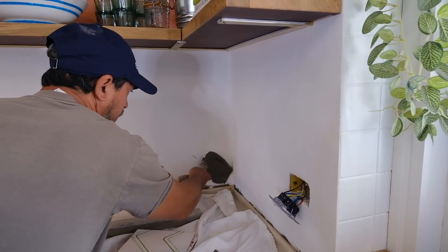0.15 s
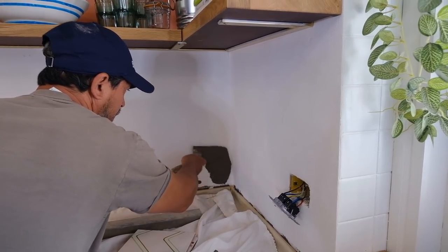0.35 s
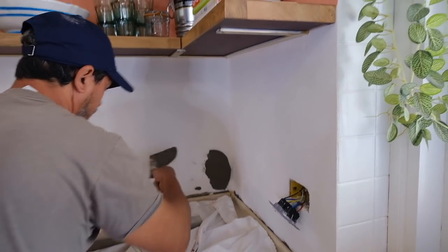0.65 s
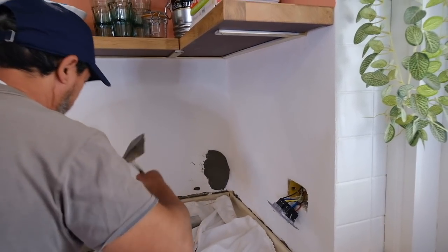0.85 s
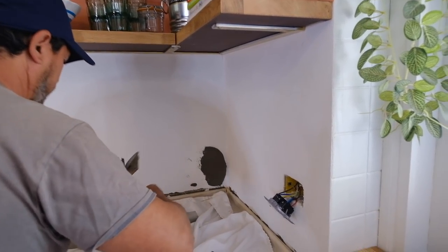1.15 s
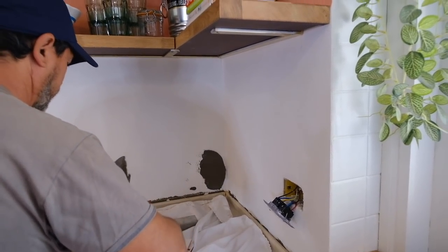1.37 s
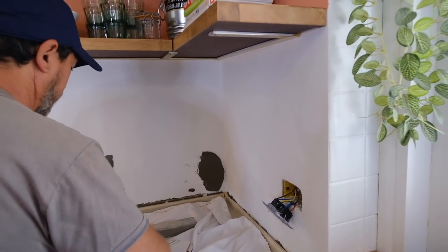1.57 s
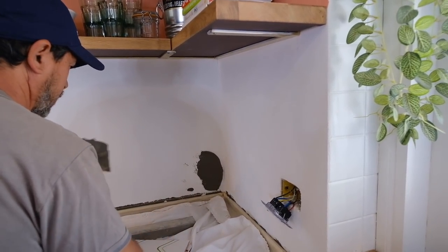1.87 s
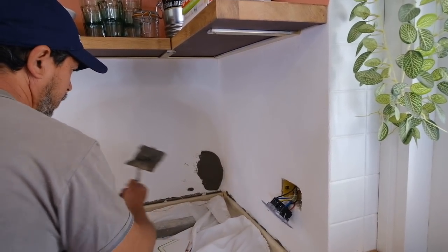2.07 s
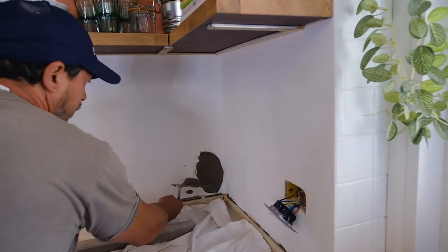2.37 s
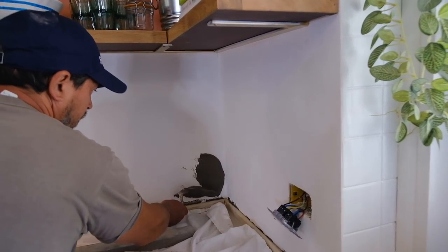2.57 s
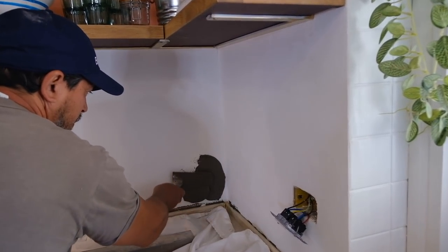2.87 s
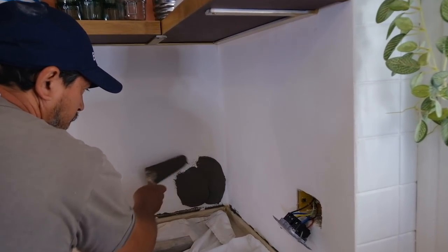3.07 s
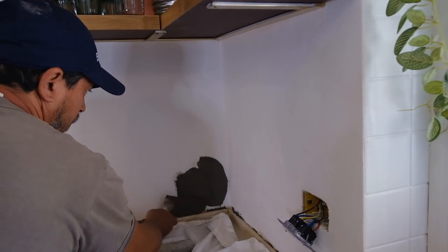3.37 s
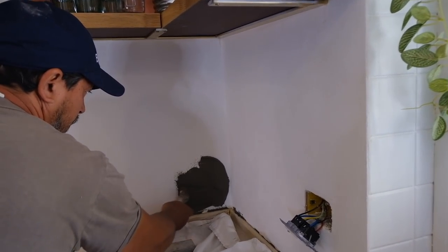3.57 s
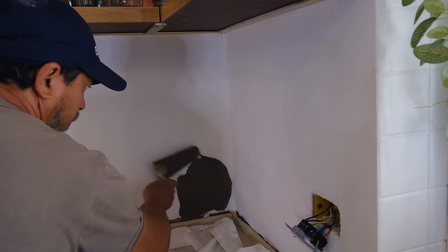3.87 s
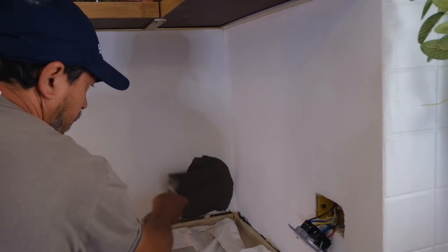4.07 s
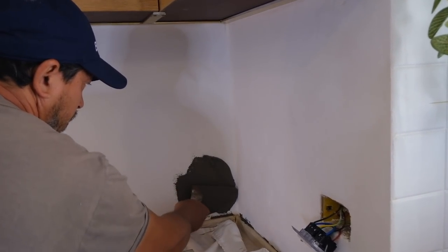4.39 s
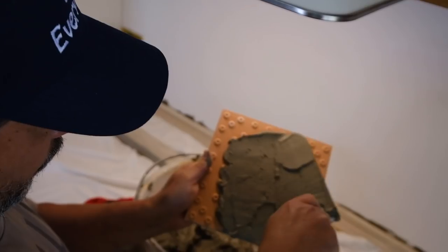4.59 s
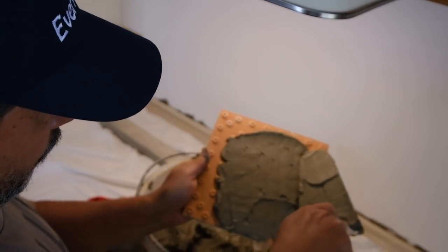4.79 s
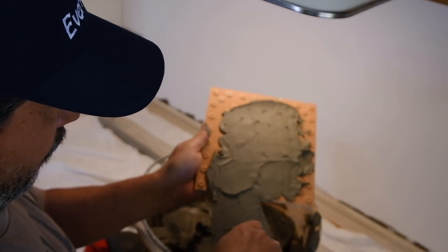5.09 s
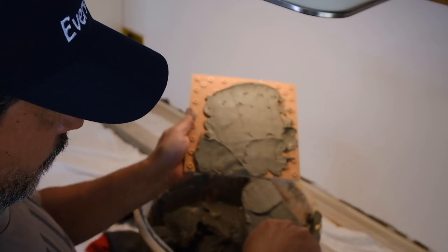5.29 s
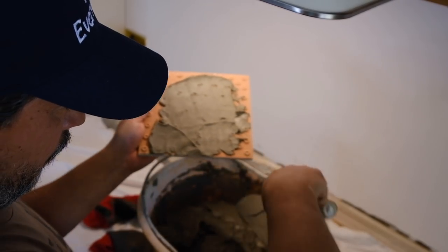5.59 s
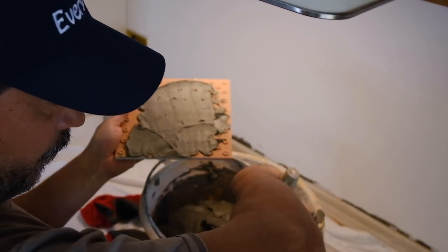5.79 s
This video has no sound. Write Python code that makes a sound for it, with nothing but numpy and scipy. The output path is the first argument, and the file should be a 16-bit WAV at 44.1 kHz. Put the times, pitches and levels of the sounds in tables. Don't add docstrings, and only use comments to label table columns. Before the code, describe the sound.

Short sandy trowel scrapes and clinks on a wall, then chattering drags over a tile back, in a bright, reverberant room.

```python
import sys
import numpy as np
from scipy import signal
from scipy.fft import rfft, irfft, next_fast_len
from scipy.io import wavfile
from scipy.ndimage import map_coordinates

SR = 44100
rng = np.random.default_rng(int(sys.argv[2]) if len(sys.argv) > 2 else 0)


def makeup_ratio(level_db):
    decades = np.asarray(level_db, float) / 20
    return 10 ** decades


def output_pcm(signal):
    pcm = np.clip(np.atleast_2d(signal).T, -1, 1) * 32767
    wavfile.write(sys.argv[1], SR, np.round(pcm).astype(np.int16))


N = 261954
RING_N = 4000
TAIL_N = int(0.7 * SR)
LEAD_N = 64

# (start [s], length [s], force [dB], swell or fade [dB], edge steepness [dB])
WALL_PUSHES = [
    [(.466, 0.044, -32.5, 3.5, 10), (.505, 0.044, -25.5, 8, -4.5), (.556, 0.025, -19.5, -7.5, -10)],
    [(1.197, 0.04, -20.5, -16.5, 4), (1.254, 0.069, -38, 7.5, -4), (1.335, 0.022, -31.5, 3, 0.5),
     (1.357, 0.032, -31, -0.5, 1.5)],
    [(1.39, 0.021, -34.5, 11, 2), (1.416, 0.049, -25.5, 1, -1), (1.47, 0.022, -23, 2.5, 2.5),
     (1.496, 0.065, -21.5, -6.5, 1)],
    [(1.565, 0.036, -28.5, 3.5, 3), (1.601, 0.022, -22.5, -1.5, 2.5), (1.628, .014, -25, 1.5, 1.5),
     (1.645, 0.086, -23, 2.5, 0.1), (1.739, 0.064, -20.5, -18, 2)],
    [(3.047, 0.048, -23.5, -5, 1), (3.097, .022, -27, -4.5, -2.5)],
    [(3.875, 0.032, -20.5, -6.5, -1.5), (3.903, 0.054, -27, -8.5, -3.5)],
]
TILE_PUSHES = [
    [(4.599, .005, -39, 3, -2), (4.606, 0.022, -20.5, -1.5, 1.5), (4.636, .009, -22.5, -1.5, -1.5)],
    [(4.66, 0.005, -22, -1.5, 1.5), (4.669, .004, -19, -3, 1.5), (4.678, 0.02, -22, -9, 1.5)],
    [(4.723, 0.009, -24.5, -1.5, 3), (4.736, .016, -24, -4, 3), (4.772, .012, -26, -14, 3.5)],
    [(5.168, 0.022, -22.5, -2, 2), (5.199, 0.02, -24, -3.5, 3.5), (5.22, 0.028, -24, -1, 3.5),
     (5.252, 0.012, -21.5, -8, 3), (5.275, .014, -21, -5.5, 5), (5.293, .012, -19, -10.5, -10)],
]
# (frequency [Hz], width [Hz], level [dB])
WALL_RINGS = [
    [(1360, 90, 5.5), (1914, 110, 4.5), (2580, 133, 0.5), (2960, 100, -3), (4900, 79, -15)],
    [(936, 48, -1.5), (1336, 14, -18), (2330, 44, -11.5), (2814, 21, 0), (6060, 44, -26.5)],
    [(1700, 152, -6), (1790, 30, -7.5), (2680, 100, -5), (5680, 40, -13), (6530, 53, -12)],
    [(1284, 170, 2.5), (1650, 210, 5), (2970, 150, -2), (4460, 14, -21), (5500, 230, -9.5), (6400, 80, -11)],
    [(743, 50, 7), (1610, 40, -19), (2360, 110, -1), (3320, 78, -1), (4240, 200, -17), (5560, 68, -26)],
    [(575, 60, 3.5), (980, 160, -1), (1750, 80, -6), (3024, 26, -6), (3450, 36, -9), (3630, 110, -16),
     (6450, 41, -11)],
]
# (frequency [Hz], width [Hz], level [dB])
TILE_RINGS = [
    [(689, 24, 7.5), (1400, 29, 6.5), (1620, 50, 9), (2280, 330, 4), (3080, 48, 3.5)],
    [(996, 90, -4), (2245, 98, 6.5), (2420, 21, 6.5), (2970, 84, -3), (5340, 120, -9)],
    [(1040, 140, 0.5), (1690, 81, 9.5), (2470, 130, 6.5), (3600, 450, -3.5), (5410, 49, -18)],
    [(750, 73, -2), (1110, 19, -3.5), (1870, 46, 4), (3200, 124, -6.5), (3570, 38, -24.5),
     (4500, 47, -15.5), (5520, 30, -7)],
]
# (frequency [Hz], width [Hz], level [dB])
HOLLOWS = [(594, 62, -0.5), (400, 141, -15), (400, 24, -9), (420, 55, -10), (593, 32, 5.5), (564, 20, -14),
           (533, 52, -6), (690, 96, -4), (705, 53, -22), (368, 21, -1.5)]
# (backing thud [dB], edge bite [dB], grit hiss [dB])
VOICES = [(-12, 2, -10.5), (-10, -3.5, -5.5), (-13, -3, -8), (-13, -2, -6.5), (-8, -3, -9), (-8, 0.5, -1),
          (-10.5, -4, -12.5), (-10.5, 0.5, -8), (-2.5, -2.5, -11.5), (-16, -1, -7.5)]
SIDES_DB = [-1.3, -0.67, 0.31, -0.53, -1, -0.87, -2.2, -1.26, -1.5, -1.6]
WET_DB = [0.5, -1, -0.5, -1, -2, 0, -3, -1.5, -1.5, -0.5]
NEAR_DB = [-1, -1, -0.5, -2.5, -1.5, 1, -4.5, -1.5, -3.5, -1.5]
GRIPS_S = (0.0084, 0.004)
LIFT_S = 0.0032
THUD_FOLLOWS = 0.49
THUD_PER_EDGE, HISS_PER_EDGE = -0.2, 1
SPREAD = 3.5


def strokes(out):
    grips = np.repeat(GRIPS_S, [len(WALL_PUSHES), len(TILE_PUSHES)])
    per_stroke = zip(WALL_PUSHES + TILE_PUSHES, VOICES, WALL_RINGS + TILE_RINGS, HOLLOWS,
                     SIDES_DB, WET_DB, NEAR_DB, grips)
    for pushes, voice, rings, hollow, side_db, wet_db, near_db, grip_s in per_stroke:
        start_s = pushes[0][0]
        end_s = pushes[-1][0] + pushes[-1][1]
        t = start_s + np.arange(int((end_s - start_s) * SR) + RING_N) / SR
        touch = t < end_s + grip_s
        force = sand(len(t), per_s=9000, spread_db=3.0, clump_db=1.72) * touch

        base_db = np.insert(voice, 1, 0)
        per_edge = (THUD_PER_EDGE, 0, 1, HISS_PER_EDGE)
        follows = (THUD_FOLLOWS, 1, 1, 1)
        held_t = np.minimum(t, end_s + grip_s - LIFT_S)
        gains = [pressure(pushes, held_t, grip_s, *law) for law in zip(base_db, per_edge, follows)]

        heard = []
        for widen in (1, SPREAD):
            parts = bands(force, rings + [hollow], bed_db=-1.0, widen=widen)
            thud, *edge = [g * p / np.std(p[touch]) for g, p in zip(gains, parts)]
            heard.append(thud + sum(edge) * makeup_ratio([[side_db / 2], [-side_db / 2]]))
        direct, diffuse = heard
        add(out, start_s, direct, direct_db=-2.5, near_db=near_db - 8.0, far_db=wet_db - 7.5, diffuse=diffuse)


def sand(size, per_s, spread_db, clump_db):
    chance, sign, strength = rng.random((3, size))
    caught = chance < per_s / SR
    force = caught * np.sign(sign - 0.5) * makeup_ratio(-spread_db * np.log(strength + 0.0071))
    clumps = map_coordinates(rng.standard_normal(size // 120 + 4), [np.arange(size) / 130], order=1)
    return force * makeup_ratio(clump_db * clumps)


GRIP_CURVE = 0.83
DULLING_DB = -2.5


def pressure(pushes, t, grip_s, base_db, per_edge, follows):
    start_s, length_s, force_db, drift_db, edge_db = np.transpose(pushes)[:, :, None]
    done = np.clip((t - start_s) / length_s, 0, 1)
    grip = np.clip((t - start_s) / grip_s, 0, 1) ** GRIP_CURVE
    lift = np.clip((start_s + length_s + grip_s - t) / LIFT_S, 0, 1)
    steepness_db = edge_db + DULLING_DB * done
    level_db = force_db + base_db + follows * drift_db * done + per_edge * steepness_db
    return np.sum(grip * lift * makeup_ratio(level_db), axis=0)


# (frequency [Hz], level per Hz [dB])
STEEL = [(100, -41.5), (290, -13), (410, -15.5), (700, -8), (1600, -5), (2500, -6.5), (4000, -7.5),
         (5000, -12.5), (8000, -13), (12400, -18.5), (15500, -25), (16500, -66)]


def bands(force, rings, bed_db, widen=1):
    def body(hz):
        peaks = 0
        for centre, width, db in rings:
            damped_width = widen * max(width, centre / 22)
            peaks = peaks + makeup_ratio(2 * db) / widen / (1 + (2 * (hz - centre) / damped_width) ** 2)
        bed = makeup_ratio(2 * (along(STEEL, hz) + bed_db))
        gain = np.sqrt(bed + peaks) / (1 + (210 / (hz + 1)) ** 3)
        lowpasses = [1 / (1 + (hz / edge) ** 6) for edge in (900, 2400, 4800)]
        below = [0 * hz] + lowpasses + [1 + 0 * hz]
        return np.array([causal(gain * share) for share in np.abs(np.diff(below, axis=0))])
    return filtered(force, body)


# (start [s], held [s], level [dB], pitch [Hz])
DRONES = [(1.48, 0.026, -35, 414), (1.61, 0.021, -38, 405), (1.665, .07, -35, 409), (1.755, .07, -35, 410),
          (3.097, .022, -23, 743), (3.1, 0.018, -25, 625), (3.878, .035, -22, 570), (5.292, .04, -37, 364),
          (.65, 0.013, -40, 420), (.52, 0.048, -31, 600), (3.05, 0.017, -28, 590), (1.64, .07, -29, 1640),
          (1.79, .06, -40, 1110)]


def drones(out, rise_s=0.0063, t60_s=0.09, waver_db=3.5, drift_rad=0.055):
    t = np.arange(3 * RING_N) / SR
    dry = np.zeros(N + 3 * RING_N)
    for s, held_s, db, hz in DRONES:
        waver = map_coordinates(rng.standard_normal(20), [t * 50])
        phase = 2 * np.pi * hz * t + np.cumsum(rng.normal(0, drift_rad, len(t)))
        decay_db = -60 * np.maximum(t - held_s, 0) / t60_s
        level = makeup_ratio(db + waver_db * waver + decay_db) * (1 - np.exp(-t / rise_s))
        dry[round(s * SR):][:len(t)] += level * np.sin(phase)
    add(out, 0, dry, direct_db=-2.5, near_db=-11.0, far_db=-13.5)


# (time [s], peak [dB], thud re ring [dB], bite re ring [dB], contact [ms])
TAPS = [(0.42, -46, 3, -11, 2.9), (0.5357, -11, -31, 1, 2.8), (0.572, -15, -15, -22, 4.6),
        (1.195, -8.5, -7.5, -0.5, 4.7), (1.2961, -31, -6, 9, 6.9), (1.3388, -17, -8, -5, 4),
        (1.495, -12.5, -12.5, -6, 1.9), (1.6523, -8.5, -32, -12, 4.7), (1.6792, -16.5, -22, -7, 7.6),
        (2.8192, -47, 3, 10, 7.5), (2.829, -46.5, 7, 13.5, 4.5), (2.875, -42.5, 2, 12.5, 13),
        (3.0486, -22.5, 2, 5, 3.4), (3.0854, -19.5, -6, 2.5, 5.7), (3.3915, -24, -5.5, -7, 4),
        (3.8843, -10.5, -18, 2, 4.4), (4.351, -37, 1, 1.5, 4.8), (4.7724, -14.5, -29, 0.5, 3.6),
        (5.04, -40, -9, 7, 4), (5.046, -27, 0, 8, 4.9), (5.257, -11.5, -33, -2, 3.2),
        (0.5218, -16.5, -25, 1, 3.3), (.5535, -16.5, -23, -7, 2.4), (1.402, -19, -16, 2, 3.7),
        (1.474, -14, -14.5, -1, 4), (1.571, -19, -18, -2, 4), (3.056, -19.5, -12, 3, 2.4),
        (4.6716, -15, -24, 2, 3), (5.1745, -16, -20, 4, 3), (5.2022, -15, -20, -1.5, 3.5),
        (5.2237, -16, -20, -2, 2.5), (5.2764, -17, -20, 1.5, 3), (5.296, -19.5, -18, -1.5, 2.8)]
# (frequency [Hz], width [Hz], level [dB])
EDGE_RINGS = [(2430, 530, -4.5), (5110, 510, -6)]
TAP_HISS_DB, TAP_HISS_PER_BITE = -7.5, 0.46


def taps(out):
    t = np.arange(RING_N) / SR
    contact_ms = np.transpose(TAPS)[4][:, None, None]
    force = rng.standard_normal((len(TAPS), 1, RING_N)) * np.exp(-2000 * t / np.maximum(contact_ms, 0.2))
    force[..., 0] = 2.95
    force = irfft(np.exp(1j * np.angle(rfft(force)))) * (t < 0.03)
    for (s, db, thud_db, bite_db, _), parts in zip(TAPS, bands(force, EDGE_RINGS, bed_db=3.0)):
        hiss_db = TAP_HISS_DB + TAP_HISS_PER_BITE * bite_db
        levels_db = (thud_db, 0, bite_db, hiss_db)
        dry = sum(makeup_ratio(db + rel_db - 4.0) * p / np.abs(p).max() for rel_db, p in zip(levels_db, parts))
        add(out, s, dry, direct_db=0.2, near_db=-2.0, far_db=-4.5, size=TAIL_N // 2)


# (time [s], peak [dB])
FLICKS = [
    (0.746, -33.5),
]


def flicks(out):
    t = np.arange(RING_N) / SR
    for s, db in FLICKS:
        burst = rng.standard_normal(RING_N) * np.exp(-t / 0.00094)
        flick = filtered(burst, lambda hz: causal(1 / (1 + (4700 / (hz + 1)) ** 8 + (hz / 11000) ** 4)))
        add(out, s, makeup_ratio(db) * flick / np.abs(flick).max(), direct_db=6.0, near_db=-16, far_db=-23.0)


# (time [s], peak [dB], pitch [Hz])
CHINKS = [
    (2.879, -31, 2320),
    (2.8175, -40, 2700),
    (3.883, -14, 1750),
    (0.47, -10, 2100),
    (1.363, -30, 6050),
    (3.393, -30, 900),
    (3.394, -36, 1600),
    (5.201, -21, 1930),
    (4.672, -16, 2700),
]


def chinks(out):
    damped_notes(out, CHINKS, t60_s=0.022, rise_s=0.0012, sag=0.06, over=1.17, over_db=-6.0, wet_db=-15.0)


# (time [s], peak [dB], pitch [Hz])
BUMPS = [(0.328, -38.5, 462), (0.344, -54, 291), (0.515, -38, 447), (0.656, -33.5, 400),
         (0.743, -44.5, 392), (2.104, -44, 268.6), (2.815, -37, 358), (2.843, -41, 290),
         (2.874, -35.5, 286), (2.904, -49, 330), (3.1, -28.5, 308), (3.39, -26, 397), (3.423, -32, 316),
         (3.953, -26, 305), (4.351, -25.5, 355), (4.375, -29.5, 310), (4.398, -37, 299), (4.419, -41, 294),
         (4.454, -41, 278), (5.293, -33, 370),
         (.325, -38, 640), (1.197, -26, 400), (1.215, -32, 163), (4.351, -39.5, 177), (4.381, -29.5, 244),
          (1.51, -39.5, 125), (1.551, -33, 298), (1.61, -38, 200), (1.63, -37, 302), (1.668, -39, 240),
          (1.76, -41, 99), (1.785, -36.5, 192)]


def bumps(out):
    damped_notes(out, BUMPS, t60_s=0.046, rise_s=0.003, sag=0.47, over=0.424, over_db=-12.5,
                 wet_db=-7.5)


# (time [s], peak [dB], pitch [Hz])
TICKS = [
    (1.156, -30.5, 1140),
    (2.232, -30, 640),
    (2.253, -29, 594),
    (2.442, -30.5, 563),
    (2.643, -31, 686),
    (2.923, -30.5, 713),
    (3.613, -37, 880),
    (4.264, -29.5, 522),
    (4.504, -32, 533),
]


def ticks(out):
    damped_notes(out, TICKS, t60_s=0.012, rise_s=0.0019, sag=0.92, over=2.97, over_db=-12.5, wet_db=-20.0)


def damped_notes(out, rows, t60_s, rise_s, sag, over, over_db, wet_db):
    t = np.arange(RING_N) / SR
    dry = np.zeros(N + RING_N)
    for s, db, hz in rows:
        sagging = sag * t60_s / 4 * (1 - np.exp(-4 * t / t60_s))
        phase = 2 * np.pi * hz * ((1 - sag / 2) * t + sagging)
        tone = np.sin(phase) + makeup_ratio(over_db) * np.sin(over * phase)
        level = makeup_ratio(db + 3.5 - 60 * t / t60_s) * (1 - np.exp(-t / rise_s))
        dry[round(s * SR):][:RING_N] += level * tone
    add(out, 0, dry, direct_db=-3.5, near_db=wet_db, far_db=wet_db)


def add(out, s, dry, direct_db=-2.0, near_db=-7, far_db=-7, diffuse=None, size=TAIL_N):
    far = makeup_ratio(far_db) * np.pad(echoes(ROOM, size=size), ((0, 0), (260, 0)))
    close = makeup_ratio(near_db) * echoes(CORNER, size=2048)
    close[:, :4 * LEAD_N] += makeup_ratio(direct_db) * straight()
    part = out[:, round(s * SR):]
    for sound, path in ((dry, close), (dry if diffuse is None else diffuse, far)):
        heard = signal.oaconvolve(np.atleast_2d(sound), path, axes=1)
        heard = heard[:, LEAD_N:][:, :part.shape[1]]
        part[:, :heard.shape[1]] += heard


def straight():
    pair = np.zeros((2, 4 * LEAD_N))
    pair[0, LEAD_N] = 1
    pair[1, LEAD_N + rng.integers(12, 40)] = rng.choice([-1, 1])
    return ports(pair)


# (frequency [Hz], T60 [s])
ROOM = [(150, 0.35), (500, 0.54), (1500, 0.57), (4000, 0.44), (8000, 0.44), (15000, 0.35)]
# (frequency [Hz], T60 [s])
CORNER = [(300, 0.0625), (8000, 0.063)]


def echoes(t60_points, size):
    hz, t, z = signal.stft(rng.standard_normal((2, size)), SR, nperseg=128)
    decay = makeup_ratio(-60 * t / along(t60_points, hz)[:, None])
    tail = signal.istft(z * decay, SR, nperseg=128)[1]
    tail = ports(np.pad(tail, ((0, 0), (LEAD_N, 0))))
    return tail / np.sqrt(np.sum(tail ** 2) / 2)


# (frequency [Hz], left-right correlation [0..1])
ALIKE = [(250, .999), (450, .996), (700, .97), (1000, .86), (1400, .7), (2800, .4), (5600, .16),
         (11000, .02)]


def ports(pair):
    def mid_side(hz):
        turn = np.arccos(np.clip(along(ALIKE, hz), -1, 1)) / 2
        return np.array([np.cos(turn), np.sin(turn)])
    mid, side = filtered(pair, mid_side)
    return np.array([mid + side, mid - side])


def earlier(level_db=-4, ago_s=0.057):
    tail = filtered(echoes(ROOM, size=TAIL_N), lambda hz: makeup_ratio(along(STEEL, hz)) / (1 + (hz / 5000) ** 2.4))
    tail = makeup_ratio(level_db) * tail / np.linalg.norm(tail[0])
    return np.pad(tail[:, int(ago_s * SR):], ((0, 0), (0, N)))[:, :N]


# (middle [s], length [s], rustle [dB], low shuffle re rustle [dB], thin swish re rustle [dB])
MOVES = [(0.181, 0.18, -62.5, -3, -17), (0.285, 0.13, -64.5, 5.5, -10), (0.48, 0.23, -49.5, -14.5, -7),
         (0.745, 0.07, -59, 3.5, -23), (0.836, 0.093, -53.5, -9, -5.5), (1.07, .14, -68, -1, 6),
         (2.036, 0.17, -68, -9, -21), (2.25, 0.047, -81, 19.5, -12), (2.447, 0.17, -68, -6, -2.5),
         (2.747, 0.2, -63, -9, -3.5), (2.895, 0.12, -63, 7, -19), (3.046, 0.11, -54.5, -7, -4),
         (3.53, 0.21, -71.5, 4, 1), (3.777, 0.2, -60.5, 7, -8), (3.888, 0.069, -53, -14, 1.5),
         (4.205, 0.089, -65, -10, -22), (4.263, 0.04, -73, 2, -18), (4.4, 0.11, -74, 11, -10),
         (4.533, 0.36, -64.5, 2.5, -6), (5.083, 0.069, -60, 3, -14), (5.16, 0.046, -47, -25, -6.5),
         (5.565, 0.089, -68.5, -17, -16), (5.71, 0.26, -67, -4.5, -6), (5.873, 0.1, -64.5, -9, -2.5)]
# (frequency [Hz], level per Hz [dB])
CLOTH = [(120, -18), (220, -0.5), (330, 8.5), (600, -8.5), (1200, -16), (2400, -26.5)]
# (frequency [Hz], level per Hz [dB])
FUZZ = [(700, -8.5), (1500, -2), (2500, -1), (4000, -4.5), (5500, -12), (9000, -38.5)]
# (frequency [Hz], level per Hz [dB])
SWISH = [(3500, -20), (6000, 1), (8000, -2.5), (11000, -6.5), (16000, -10.5)]


def stirring():
    t = np.arange(N) / SR
    swells = 0
    for s, length_s, db, low_db, thin_db in MOVES:
        levels = makeup_ratio([[db + low_db], [db], [db + thin_db]])
        swells = swells + levels * np.exp(-(1.55 * (t - s) / length_s) ** 2)
    return sum(swell * noise(colour, lumps_db=2.0, per_s=34)
               for swell, colour in zip(swells, (CLOTH, FUZZ, SWISH)))


# (frequency [Hz], level [dB])
HUM = [(27, -73.5), (59, -85), (282, -70), (705, -72)]
# (frequency [Hz], level per Hz [dB])
AIR = [(12, -30), (20, 0), (123, -1), (177, -5), (277, -4.5), (499, -7.5), (698, -5), (1000, -8.5),
       (1190, -7.5), (1480, -13), (3530, -17.5), (3840, -19), (12100, -30.5), (14700, -28), (16000, -36)]
AIR_DB = -62


def background():
    t = np.arange(N) / SR
    hum = 0
    for hz, db in HUM:
        phase_drift = np.cumsum(rng.normal(0, 0.0138, N))
        hum = hum + makeup_ratio(db + 3.5) * np.sin(2 * np.pi * hz * t + phase_drift)
    return hum + makeup_ratio(AIR_DB + 3.5) * noise(AIR, lumps_db=0.25, per_s=5)


def noise(spectrum, lumps_db, per_s):
    wander = map_coordinates(rng.standard_normal(int(N * per_s / SR) + 4), [np.arange(N) * per_s / SR])
    coloured = filtered(rng.standard_normal((2, N)), lambda hz: makeup_ratio(along(spectrum, hz)))
    return unit(makeup_ratio(lumps_db * wander) * ports(coloured))


def unit(x):
    return x / np.sqrt(np.mean(x ** 2) + 1e-20)


def along(points, hz):
    f, v = np.transpose(points)
    return np.interp(np.log(hz + 1), np.log(f + 1), v)


def filtered(x, response):
    m = next_fast_len(x.shape[-1] + 8192)
    return irfft(rfft(x, m) * response(np.fft.rfftfreq(m, 1 / SR)), m)[..., :x.shape[-1]]


def causal(gain):
    cepstrum = irfft(np.log(gain + 1e-6))
    half = len(cepstrum) // 2
    folded = np.r_[cepstrum[0], 2 * cepstrum[1:half], np.zeros(len(cepstrum) - half)]
    return np.exp(rfft(folded))


def scene():
    out = stirring() + background() + earlier()
    strokes(out)
    drones(out)
    taps(out)
    flicks(out)
    chinks(out)
    bumps(out)
    ticks(out)
    return out


def top_cut(x):
    return signal.sosfilt(signal.butter(12, 16850, fs=SR, output="sos"), x)


def record(dry):
    mix = filtered(dry, lambda hz: hz < 16280)
    return top_cut(mix)


dry = scene()
out = record(dry)
output_pcm(out)
```